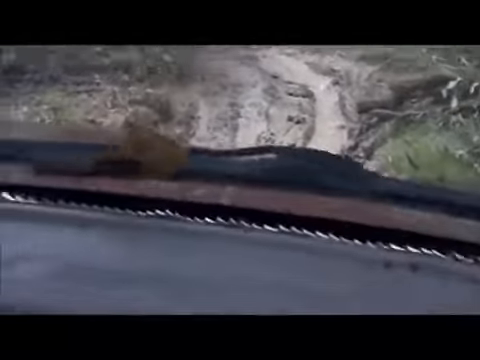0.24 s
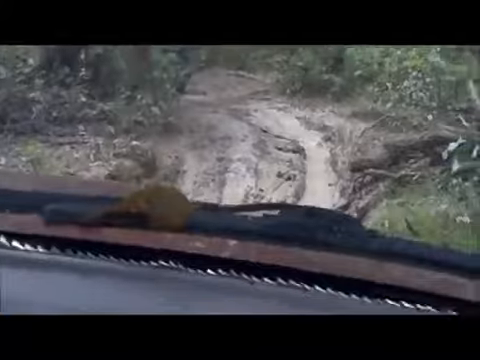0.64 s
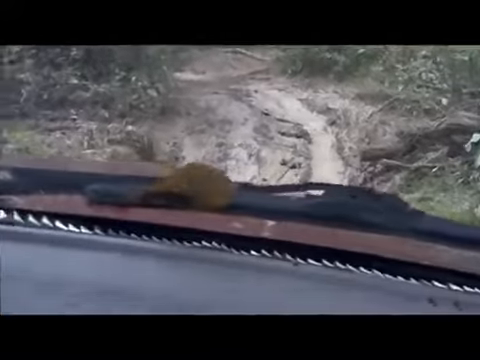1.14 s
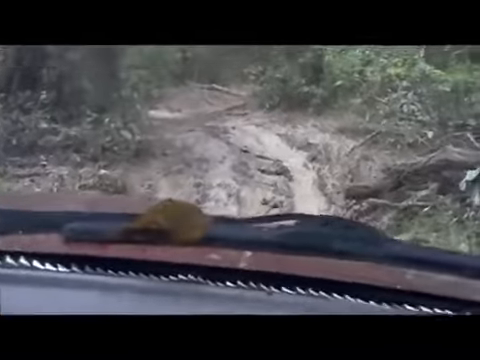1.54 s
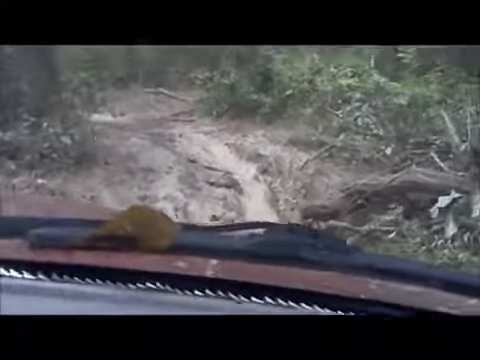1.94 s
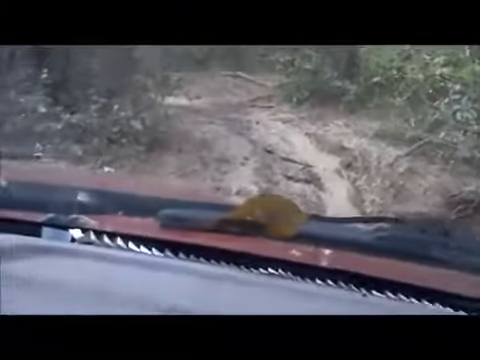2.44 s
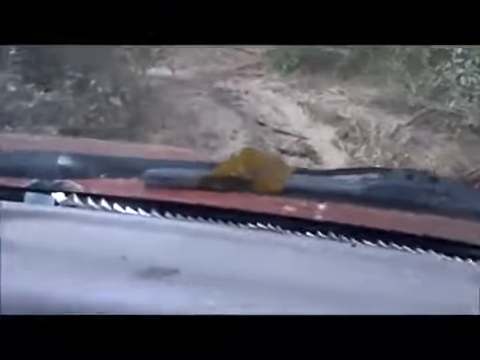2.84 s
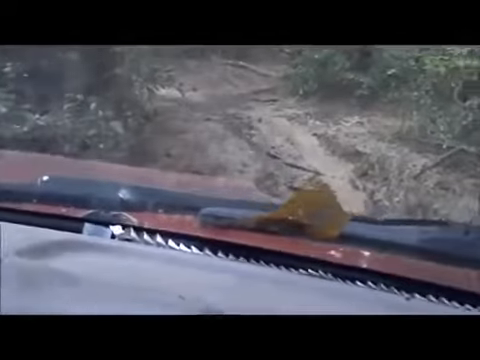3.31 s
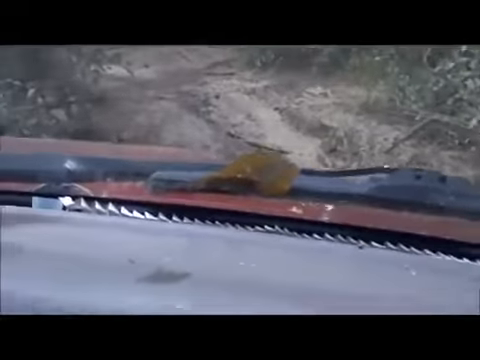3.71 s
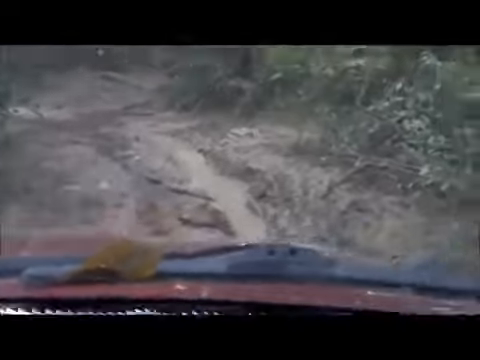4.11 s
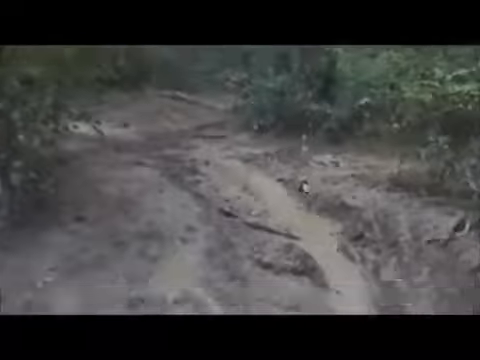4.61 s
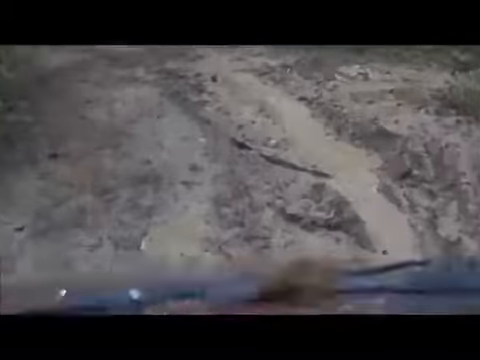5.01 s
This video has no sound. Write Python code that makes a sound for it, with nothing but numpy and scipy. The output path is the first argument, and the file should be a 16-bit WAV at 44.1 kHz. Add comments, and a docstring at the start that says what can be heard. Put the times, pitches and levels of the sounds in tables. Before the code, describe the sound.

Inside an off-roader's cab, a lumpy engine idles with low thumps, surges briefly, settles back, then revs hard at the end over mud.

```python
"""Crawling along a muddy trail

Inside an off-roader's cab: a lumpy idle, a dab of throttle, idling again and a final rev.
Engine firings drive the cab boom, panel growl and pulsing clatter; the exhaust barks at high revs.
Low thumps and swells in the cab, from jolts or heavy engine beats, are an unsteady tone and low noise.
Gliding tones hum, whine and sing in the driveline, alternator and belt, and groan in rubber mounts.
Loose fittings knock as ringing modes with noise bursts, and one dry tick is a short, low ring."""
import sys
import numpy as np
from scipy import signal
from scipy.fft import rfft, irfft
from scipy.io import wavfile
from scipy.ndimage import uniform_filter1d

SR = 44100
rng = np.random.default_rng(int(sys.argv[2]) if len(sys.argv) > 2 else 0)


def generate_wav(sig):
    """Save sig (samples, or channels by samples) to the path in sys.argv[1] as 16-bit PCM at SR."""
    pcm = np.round(np.clip(np.atleast_2d(sig).T, -1, 1) * 32767).astype(np.int16)
    wavfile.write(sys.argv[1], SR, pcm)


N = 231954
TIME = np.arange(N) / SR   # seconds

# crankshaft: (time [s], speed [turns per s])
CRANK_SPEED = [(0, 21.2), (.45, 17.5), (.85, 17.6), (1.0, 19.6), (1.13, 19.8), (1.27, 23.7), (1.36, 27.8),
               (1.5, 27.9), (1.8, 29.3), (1.88, 28), (2.0, 22), (2.3, 19.6), (2.7, 18.8), (3.1, 20.4),
               (4.27, 18), (4.36, 19.8), (4.47, 22.5), (4.58, 30.3), (4.68, 37.8), (4.76, 43), (4.84, 51.1),
               (4.92, 56), (5.0, 60.7), (5.1, 61), (5.26, 69.6)]
IDLE_SPEED, FLAT_OUT_SPEED = 17, 70   # turns per s
# throttle: (time [s], opening [0-1])
THROTTLE_OPENING = [(.88, .05), (1.0, 0.2), (1.28, 0.2), (1.45, 0.89), (1.85, 0.73), (2.0, .45), (2.2, 0.3),
                    (2.7, 0), (4.22, .05), (4.33, 0.3), (4.58, .55), (4.72, 0.8), (5.05, 0.47), (5.22, 0.1)]
# engine effort, before each noise's own offset is added: (time [s], level [dB])
ENGINE_LOAD = [(0.0, -63.5), (0.21, -61.5), (0.38, -64), (0.65, -62), (0.79, -64.5), (0.94, -61.5),
               (1.0, -64.5), (1.25, -67.5), (1.37, -61.5), (1.65, -62.5), (1.86, -59), (2.1, -67.5),
               (2.39, -64.5), (2.82, -63.5), (2.87, -67), (3.16, -61.5), (3.26, -64.5), (3.67, -62.5),
               (3.8, -66), (3.87, -62.5), (4.19, -64.5), (4.4, -67), (4.55, -65), (4.71, -61.5),
               (4.9, -55.5), (5.25, -58.5)]
# cylinders in firing order: (strength [dB])
CYLINDER_STRENGTHS = [5, -2.5, 3, -12.5]
# firing strength varies more with the throttle shut than open
SHUT_SPREAD_DB, OPEN_SPREAD_DB = 1.6, 1.2

# resonances of the air in the cab: (frequency [Hz], width [Hz], relative level [dB])
CAB_MODES = [(74.4, 53, -10.5), (126.1, 18.4, -3.5), (139, 17.7, 2), (166, 38.5, -6.5), (194, 7.8, -14),
             (225.7, 38.3, -10), (273, 35, -14.5)]
# resonances of the body panels: (frequency [Hz], width [Hz], relative level [dB])
PANEL_MODES = [(272, 51, -3), (360, 49, -1.5), (393, 52, -0.5), (440.6, 60, -5), (511, 53, -9.5),
               (705, 78, -23.5)]
# resonances of the engine bay that colour the clatter: (frequency [Hz], width [Hz], relative level [dB])
BAY_MODES = [(643, 99, 0), (1200, 160, -8), (1700, 34, -10), (2702, 58, -8), (2654, 100, -15.5)]
# intake roar, growing with the revs: (frequency [Hz], width [Hz], relative level [dB])
INTAKE_MODES = [(536, 87, -6.5), (874, 95, -4.5), (1420, 220, -10.5), (1910, 180, -11.5), (2300, 570, -15)]

# colour of the mechanical clatter: (frequency [Hz], relative level [dB per Hz])
CLATTER_COLOUR = [(280, -33.5), (480, -13), (562, -6), (700, 0), (777, -4), (1180, -8.5), (1340, -14.5),
                  (1450, -9), (1570, -13.5), (2280, -15), (3480, -24), (3900, -29), (5070, -62),
                  (8580, -120)]
# colour of the hiss: (frequency [Hz], relative level [dB per Hz])
HISS_COLOUR = [(3000, -7.5), (4300, 1), (5500, -1), (7000, -5.5), (8500, -9)]
# colour of the highest, sizzling noise: (frequency [Hz], relative level [dB per Hz])
SIZZLE_COLOUR = [(8000, 1), (10000, 6), (12000, 3.5), (15000, 2.5)]

# Loudness of five engine noises, one row each:
# (offset at idle [dB], added by full throttle [dB], added flat out [dB], share of the load's swing [ratio])
BOOM_LOUDNESS = (28.5, -3, -8, 1.9)
GROWL_LOUDNESS = (11.5, 2, 5, 1.5)
CLATTER_LOUDNESS = (8, -2.5, -3.5, 1.87)
HISS_LOUDNESS = (-8, -4.5, -4, 1.76)
SIZZLE_LOUDNESS = (-12.5, -6.5, -10.5, 1.5)

# crank orders one to seven (multiples of the crank speed):
# (with throttle shut [dB], with throttle open [dB], added flat out [dB])
CRANK_ORDERS = [(-18, -17.5, 18.5), (-7.5, 4.5, 1.5), (-13, 1, 10), (-12.5, -19.5, 9), (-12.5, 4.5, -16.5),
                (-11.5, -26.5, -6), (-11, -26.5, -6.5)]
# how loud the cab makes an order at each pitch: (frequency [Hz], level [dB])
CAB_ORDER_GAIN = [(33, -46), (41, -36), (48, -40), (57, -43.5), (69, -39.5), (86, -48.5), (102, -33),
                  (120, -33.5), (128, -24.5), (142, -26.5), (165, -27.5), (185, -30), (205, -42.5),
                  (250, -33), (420, -49)]
ORDER_WAVER_DB, ORDER_WANDER_RAD = 2.5, .15   # unsteadiness at idle, fading as the revs rise
# exhaust orders at full throttle and revs, at each pitch: (frequency [Hz], level [dB])
EXHAUST_GAIN = [(220, -37), (270, -34), (335, -29.5), (385, -33.5), (440, -40), (540, -44), (750, -50.5)]
HALF_ORDER_DB = -8   # half orders against whole ones

# low thumps and swells in the cab, from jolts or heavy engine beats:
# (time [s], rumble level [dB], thump level [dB])
CAB_THUMPS = [(0.119, -51, -28), (0.386, -37, -28.5), (0.529, -67, -23), (0.62, -53.5, -23.5),
              (0.68, -36.5, -23), (0.897, -51, -26.5), (0.952, -37, -24.5), (1.331, -52.5, -28.5),
              (1.549, -45, -22.5), (1.772, -49.5, -22), (1.879, -38.5, -22), (2.209, -43, -28.5),
              (2.743, -38.5, -26), (2.798, -56, -24), (3.092, -42, -27), (3.133, -53, -26.5),
              (3.252, -48, -24.5), (3.35, -49, -25), (3.437, -39, -26), (3.611, -39, -24),
              (3.654, -49, -24), (3.862, -45, -28), (3.956, -53, -30.5), (4.051, -58, -29),
              (4.29, -35, -37.5), (4.649, -31, -44), (4.91, -44, -32), (5.059, -41, -45.5)]
RUMBLE_SWELL_S, THUMP_SWELL_S = 0.055, 0.012   # from a swell's peak down to 0.61 of it
THUMP_HZ = 135
THUMP_GROWL_DB, THUMP_CLATTER_DB = -28.5, -30   # panel growl and clatter in a thump, against its tone
# colour of the tyre rumble: (frequency [Hz], relative level [dB per Hz])
RUMBLE_COLOUR = [(18, -22), (30, -9.5), (42, -10.5), (60, 3), (80, 1.5), (100, 0.5), (140, -19)]
ROLLING_DB = -42   # tyre rumble between swells, at mean load

# alternator whine: (time [s], frequency [Hz], level [dB])
ALTERNATOR_WHINE = [(.03, 940, -83), (.13, 999, -56), (.21, 1146, -59), (.31, 1045, -62), (.42, 1011, -60),
                    (.52, 935, -60), (.63, 904, -53.5), (.75, 865, -72), (.85, 860, -98)]
# gliding drones: the first two are crank orders of the engine, the rest hum in driveline and body; # a row that
# ends before it starts stays silent: # (start [s], end [s], start pitch [Hz], end pitch [Hz], level [dB])
DRIVELINE_HUMS = [(0.1, .44, 70.5, 67.5, -34.5), (0.098, 0.38, 141.3, 137.6, -35),
                  (0.1, 0.586, 238, 250, -45), (0.095, 1.055, 262, 200, -51), (0.3, 0.831, 69, 300, -47.5),
                  (1.9, 2.712, 182, 176.8, -42.5), (2.961, 3.461, 176, 180.3, -39.5),
                  (2.4, 4, 150, 118.9, -38.5), (2.769, 3.582, 210, 89, -42), (4.6, 3.704, 63, 118.3, -33.5),
                  (3.97, 4.24, 121, 127.7, -33.5), (3.352, 4.095, 250.6, 259.4, -44.5),
                  (3.5, 4.306, 229, 256.9, -45.5)]
# spells of belt singing: (start [s], end [s], level [dB])
BELT_SPELLS = [(0.137, 0.306, -63.5), (.47, 0.889, -71), (1.546, 2.025, -75), (2.154, 2.567, -72),
               (2.66, 2.755, -68.5), (2.856, 2.92, -65), (3.078, 3.387, -70.5), (3.6, 4.204, -75)]
# tones of the belt, against the level of the spell: (frequency [Hz], relative level [dB])
BELT_PITCHES = [(1469, 2), (2580, -8.5)]
HUM_FADE_S, BELT_FADE_S = 0.052, 0.079
WHINE_ROUGH, BELT_ROUGH, EXHAUST_ROUGH = .55, .5, .2   # noisy share of each tone's power

# knocks of loose fittings, before the offsets in knocks():
# (time [s], dull thud level [dB], sharp click level [dB], favoured ring pitch [Hz])
FITTING_KNOCKS = [(0.866, -48, -47.5, 1600), (1.778, -41.5, -40.5, 990), (1.825, -32, -34, 648.5),
                  (1.837, -35, -56, 400), (1.868, -45.5, -53.5, 400), (1.884, -49, -58, 644),
                  (1.957, -46, -48.5, 400), (2.834, -53.5, -58.5, 660), (2.938, -38.5, -44, 1004),
                  (2.947, -40.5, -45.5, 1211), (2.953, -36.5, -59, 690), (2.961, -42, -63, 400),
                  (2.971, -46.5, -65, 698), (3.712, -50, -54, 1000), (4.24, -56, -47, 2300),
                  (4.267, -39, -56, 653.6), (4.279, -46, -49, 503), (4.29, -52.5, -55, 900),
                  (4.363, -48.5, -68, 680), (4.452, -56, -64, 1300), (4.649, -48, -52, 690),
                  (5.199, -43.5, -57, 700)]
# resonances of the fittings: (frequency [Hz], relative level [dB], time to fall 60 dB [s])
FITTING_MODES = [(302, 4, 0.26), (385.8, 7.5, 0.087), (448.3, -2.5, .14), (502, 2, 0.036),
                 (626, 1.5, 0.082), (708, 2, 0.07), (908, -1.5, 0.053), (1011, -7.5, .1),
                 (1210, -4.5, 0.066), (1477, -9.5, 0.073), (1620, -6, 0.18), (1850, -11, 0.078),
                 (2334, -14, 0.16), (2610, -12, 0.092)]
# the trim's dull share of a knock: (frequency [Hz], relative level [dB per Hz])
THUD_COLOUR = [(300, -7.5), (420, 8.5), (800, -1.5), (1300, 2), (2200, -11.5)]
# the sharp share of a knock: (frequency [Hz], relative level [dB per Hz])
CLICK_COLOUR = [(500, -24), (1200, 4.5), (3000, -1), (5000, -11), (7000, -18), (11000, -24.5),
                (15000, -28.5)]
KNOCK_FOCUS_DB = 5.5   # loss per octave away from the favoured pitch
KNOCK_RING_DB = -2.5   # ringing of the fittings, against the thud level
THUD_T60_S, CRACK_T60_S, CRACK_TAIL_T60_S = .036, .014, .09   # times to fall 60 dB
CONTACT_S = .0012   # build-up of a crack

# a single dry tick: start, level, pitch, time to fall 60 dB, softness of the edge
TICK_S, TICK_DB, TICK_HZ, TICK_RING_S, TICK_EDGE_S = 3.7445, -26, 140, .018, .00015

# groans of rubber mounts as the body twists:
# (start [s], end [s], start pitch [Hz], end pitch [Hz], level [dB])
MOUNT_GROANS = [(3.852, 3.908, 433, 339.4, -51.5), (4.008, 4.062, 425, 367, -47),
                (5.119, 5.152, 345.3, 356, -33.5), (5.242, 5.264, 540, 550, -38.5)]
GROAN_FADE_S, GROAN_OCTAVE_DB = 0.015, -21   # the octave is against the main tone

# narrow dips in the microphone's response: (frequency [Hz], width [Hz])
MICROPHONE_DIPS = [(3950, 540), (6300, 200), (7900, 1200), (12450, 310)]
CUTOFF_HZ = 15050


def from_db(db):
    """Turn decibels into a multiplying factor."""
    return 10 ** (np.asarray(db) / 20)


def rms_one(x):
    """Scale a signal to an average strength (rms) of 1."""
    return x / np.sqrt(np.mean(x ** 2) + 1e-20)


def in_time(rows):
    """Read each column of a time curve at every sample."""
    s, *columns = np.transpose(rows)
    return [np.interp(TIME, s, column) for column in columns]


def drift(rate):
    """Slow random movement, of spread about 1, from noise smoothed above the rate in Hz."""
    step = 40   # the smoothing runs on every 40th sample
    r = np.exp(-2 * np.pi * rate * step / SR)
    chance = rng.standard_normal(N // step + 2002)
    slow = signal.lfilter([1], [1, -2 * r, r * r], chance)[2000:]   # skip the filter's start
    return np.interp(np.arange(N) / step, np.arange(len(slow)), rms_one(slow))


def noise(spectrum):
    """Noise of a given colour and rms 1, falling 36 dB per octave beyond the table's ends."""
    hz, db = np.transpose(spectrum)
    octave = np.log2(np.arange(N // 2 + 1) * SR / N + 1)
    points = np.log2(hz)
    beyond = np.abs(octave - np.clip(octave, points[0], points[-1]))
    colour = from_db(np.interp(octave, points, db) - 36 * beyond)
    return rms_one(irfft(rfft(rng.standard_normal(N)) * colour, N))


def resonate(x, hz, width):
    """A resonance rings at one pitch, with gain 1 at its top."""
    r = np.exp(-np.pi * width / SR)
    feed = np.array([1, 0, -1]) * (1 - r * r) / 2
    return signal.lfilter(feed, [1, -2 * r * np.cos(2 * np.pi * hz / SR), r * r], x + 1e-18)


def body(x, modes, low_hz, high_hz):
    """A vibrating body adds up its resonances, with alternating signs, within a pass band."""
    out = sum((-1) ** k * from_db(db) * resonate(x, hz, width)
              for k, (hz, width, db) in enumerate(modes))
    return signal.sosfilt(signal.butter(2, [low_hz, high_hz], "band", fs=SR, output="sos"), out)


def even(x, span=0.21):
    """Hold the running rms near 1 over a span in seconds, while keeping the single beats."""
    size = int(span * SR)
    power = uniform_filter1d(uniform_filter1d(x * x, size), size)
    return x / np.sqrt(np.abs(power) + 1e-20)


def dying(clicks, t60):
    """Each click starts a decay that falls 60 dB in t60 seconds."""
    return signal.lfilter([1], [1, -from_db(-60 / (t60 * SR))], clicks + 1e-18)


def held(start, end, attack, release):
    """1 from start to end, with a ramp before and after."""
    return np.clip(1 + np.minimum((TIME - start) / attack, (end - TIME) / release), 0, 1)


def tone(hz, waver_db, wander):
    """A gliding tone that wavers in level and, by a share of its pitch, in frequency."""
    phase = 2 * np.pi * np.cumsum(hz * (1 + wander * drift(21.2))) / SR
    return np.sqrt(2) * from_db(waver_db * drift(31)) * np.sin(phase)


def rough_tone(hz, rough, flutter_rate):
    """A tone that is partly narrow noise, so that it flutters and breaks up."""
    phase = 2 * np.pi * np.cumsum(hz * np.ones(N)) / SR
    steady = np.sqrt(2 * (1 - rough))
    in_step = steady + np.sqrt(rough) * drift(flutter_rate)
    quarter_turn = np.sqrt(rough) * drift(flutter_rate)
    return in_step * np.sin(phase) + quarter_turn * np.cos(phase)


def swells(swell_s, column):
    """Every thump in the cab swells and ebbs in a bell shape."""
    return sum(from_db(row[column]) * np.exp(-np.minimum(((TIME - row[0]) / swell_s) ** 2 / 2, 20))
               for row in CAB_THUMPS)


def firings(turns, spread_db, jitter_s):
    """Two firings a turn, each cylinder with its own strength and each firing a little off."""
    at = np.flatnonzero(np.diff(np.floor(2 * turns), prepend=-1))
    chance = rng.standard_normal((len(at), 2))
    late = (chance[:, 1] * SR * (jitter_s * spread_db)[at]).astype(int)   # below 0 is early
    strength_db = np.resize(CYLINDER_STRENGTHS, len(at)) + spread_db[at] * chance[:, 0]
    out = np.zeros(N)
    out[np.clip(at + late, 0, N - 1)] = from_db(strength_db)
    return out


def crank_tones(speed, revs, throttle):
    """Multiples of the crank speed sound as tones, coloured by the cab and unsteady at low revs."""
    turns, unsteady, out = np.cumsum(speed) / SR, (1 - revs) ** 2, 0
    hz, db = np.transpose(CAB_ORDER_GAIN)
    for order, (shut_db, open_db, revs_db) in enumerate(CRANK_ORDERS, 1):
        cab_db = np.interp(np.log(order * speed), np.log(hz), db)
        level_db = cab_db + shut_db + (open_db - shut_db) * throttle + revs_db * revs
        level_db = level_db + ORDER_WAVER_DB * unsteady * drift(33)
        phase = 2 * np.pi * order * turns + ORDER_WANDER_RAD * unsteady * drift(38)
        out = out + np.sqrt(2) * from_db(level_db) * np.sin(phase)
    return out


def exhaust(speed):
    """The pipe passes higher crank orders, gliding with the revs, with weaker half orders between."""
    hz, db = np.transpose(EXHAUST_GAIN)
    out = 0
    for half_orders in range(9, 27):
        pitch = half_orders / 2 * speed
        level_db = np.interp(np.log(pitch), np.log(hz), db) + HALF_ORDER_DB * (half_orders % 2)
        out = out + from_db(level_db) * rough_tone(pitch, EXHAUST_ROUGH, flutter_rate=12)
    return out


def noise_gain(loudness, load_db, throttle, revs):
    """An engine noise follows the load, throttle and revs, each by its own amount."""
    idle_db, throttle_db, revs_db, share = loudness
    swing_db = share * (load_db - load_db.mean())
    return from_db(load_db.mean() + swing_db + idle_db + throttle_db * throttle + revs_db * revs ** 2)


def engine():
    """Firings shake cab air and panels and pulse the clatter; thumps, crank orders and exhaust join in."""
    speed, load_db = in_time(CRANK_SPEED)[0], in_time(ENGINE_LOAD)[0]
    revs = (speed - IDLE_SPEED) / (FLAT_OUT_SPEED - IDLE_SPEED)   # 0 at idle, 1 flat out
    throttle = np.clip(in_time(THROTTLE_OPENING)[0], 0, 1)
    boom_gain, growl_gain, clatter_gain, hiss_gain, sizzle_gain = [
        noise_gain(loudness, load_db, throttle, revs)
        for loudness in (BOOM_LOUDNESS, GROWL_LOUDNESS, CLATTER_LOUDNESS, HISS_LOUDNESS, SIZZLE_LOUDNESS)]

    spread_db = SHUT_SPREAD_DB + (OPEN_SPREAD_DB - SHUT_SPREAD_DB) * throttle
    jitter_s = 0.00018 * (1 - 0.13 * revs)   # seconds per dB of spread
    pulses = firings(np.cumsum(speed) / SR, spread_db, jitter_s)
    puffs = even(dying(pulses, t60=0.11))
    beats = even(pulses)
    turbulence = even(puffs * rng.standard_normal(N))

    # each thump is a low tone, and lifts the panel growl and clatter with it
    thump_level = swells(THUMP_SWELL_S, column=2)
    thump = thump_level * tone(THUMP_HZ, waver_db=2.4, wander=0.0826)
    cab_air = body(beats + 0.22 * turbulence, CAB_MODES, low_hz=66, high_hz=302)
    boom = boom_gain * even(cab_air, span=0.14)

    # the panels mutter at idle and follow the firings as the revs rise
    shake = (0.045 + .5 * revs) * beats + 0.73 * turbulence + 0.56 * rng.standard_normal(N)
    panels = even(body(shake, PANEL_MODES, low_hz=232, high_hz=850), span=0.34)
    growl = np.hypot(growl_gain, from_db(THUMP_GROWL_DB) * thump_level) * panels

    bay = rms_one(body(turbulence, BAY_MODES, low_hz=460, high_hz=4000))
    intake = rms_one(body(turbulence, INTAKE_MODES, low_hz=413, high_hz=3240))
    rattle = (1 + 0.25 * puffs) * noise(CLATTER_COLOUR)
    rattle = rattle + 0.44 * from_db(-4 * revs) * bay + 1.2 * revs * intake
    clatter = np.hypot(clatter_gain, from_db(THUMP_CLATTER_DB) * thump_level) * even(rattle, span=0.26)

    # the bark needs both an open throttle and high revs
    bark = throttle * revs ** 2.74 * exhaust(speed)
    hiss = hiss_gain * even((1 + 0.23 * puffs) * noise(HISS_COLOUR))
    sizzle = sizzle_gain * even((1 + 0.27 * puffs) * noise(SIZZLE_COLOUR))
    return crank_tones(speed, revs, throttle) + thump + boom + bark + growl + clatter + hiss + sizzle


def tyre_rumble():
    """Lumpy low noise of the tyres comes through the chassis, swelling around each cab thump."""
    load_db = in_time(ENGINE_LOAD)[0]
    rolling = from_db(ROLLING_DB + load_db - load_db.mean())
    return np.hypot(rolling, swells(RUMBLE_SWELL_S, column=1)) * even(noise(RUMBLE_COLOUR), span=0.13)


def driveline():
    """Engine and shafts hum in gliding tones, the alternator whines and the belt sings in fluttering tones."""
    whine_hz, whine_db = in_time(ALTERNATOR_WHINE)
    whine = from_db(whine_db) * rough_tone(whine_hz, WHINE_ROUGH, flutter_rate=35)
    hums = 0
    for start, end, start_hz, end_hz, db in DRIVELINE_HUMS:
        glide = np.interp(TIME, [start, end], [start_hz, end_hz])
        level = from_db(db) * held(start, end, HUM_FADE_S, HUM_FADE_S)
        hums = hums + level * tone(glide, waver_db=2.0, wander=0.0046)
    song = sum(from_db(db) * rough_tone(hz, BELT_ROUGH, flutter_rate=18) for hz, db in BELT_PITCHES)
    spells = sum(from_db(db) * held(start, end, BELT_FADE_S, BELT_FADE_S)
                 for start, end, db in BELT_SPELLS)
    return hums + whine + song * spells


def knocks():
    """Each knock rings the fittings, with a dull thud of trim and a crack that scatters round the cab."""
    s, thud_db, click_db, ring_hz = np.transpose(FITTING_KNOCKS)
    at, ringing = np.round(s * SR).astype(int), np.zeros(N)
    chance_db = 2 * rng.standard_normal((len(at), len(FITTING_MODES)))
    for k, (hz, db, t60) in enumerate(FITTING_MODES):
        focus_db = -KNOCK_FOCUS_DB * np.abs(np.log2(hz / ring_hz))
        hits = np.zeros(N)
        hits[at] = from_db(thud_db + db + KNOCK_RING_DB + focus_db + chance_db[:, k]) * (-1) ** k
        r, w = from_db(-60 / (t60 * SR)), 2 * np.pi * hz / SR
        ringing += signal.lfilter([0, np.sin(w)], [1, -2 * r * np.cos(w), r * r], hits + 1e-18)

    thuds, cracks = np.zeros((2, N))
    thuds[at], cracks[at] = from_db(thud_db - 21), from_db(click_db - 5.5)
    soft = signal.butter(2, 2200, fs=SR, output="sos")   # padded trim gives no sharp edge
    thud = signal.sosfilt(soft, dying(thuds, t60=THUD_T60_S) * noise(THUD_COLOUR))
    crack = dying(cracks, t60=CRACK_T60_S) + 0.75 * dying(cracks, t60=CRACK_TAIL_T60_S)
    seat = np.exp(-1 / (CONTACT_S * SR))   # the crack builds up as the fitting seats itself
    crack = signal.lfilter([1 - seat], [1, -seat], crack)
    return ringing + thud + crack * noise(CLICK_COLOUR)


def tick():
    """One slightly blunted edge dies away in a short low ring."""
    since = np.maximum(TIME - TICK_S, 0)
    edge = 1 - np.exp(-since / TICK_EDGE_S)
    decay = from_db(TICK_DB - 60 * np.minimum(since / TICK_RING_S, 2))
    return edge * decay * np.cos(2 * np.pi * TICK_HZ * since)


def groans():
    """Rubber slips in short sliding tones with a faint octave."""
    out = 0
    for start, end, start_hz, end_hz, db in MOUNT_GROANS:
        glide = np.interp(TIME, [start, end], [start_hz, end_hz])
        phase = 2 * np.pi * np.cumsum(glide) / SR
        level = np.sqrt(2) * from_db(db) * held(start, end, GROAN_FADE_S, GROAN_FADE_S)
        out = out + level * (np.sin(phase) + from_db(GROAN_OCTAVE_DB) * np.sin(2 * phase))
    return out


def scene():
    """All sounds in the cab add up in one channel."""
    return (engine() + tyre_rumble() + driveline() + knocks() + tick() + groans())[None]


def record(dry):
    """The microphone has a few narrow dips, and the top of the treble is cut."""
    for hz, width in MICROPHONE_DIPS:
        dry = signal.lfilter(*signal.iirnotch(hz, hz / width, fs=SR), dry)
    return signal.sosfilt(signal.ellip(12, .1, 90, CUTOFF_HZ, fs=SR, output="sos"), dry)


dry = scene()
out = record(dry)
generate_wav(out)
```